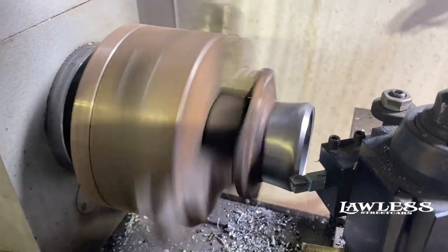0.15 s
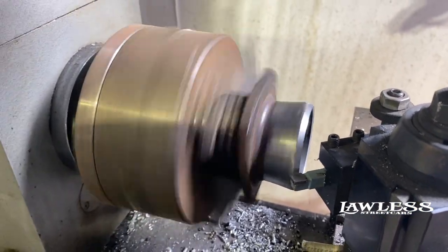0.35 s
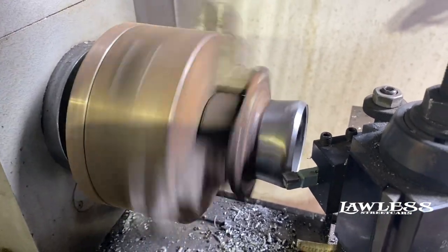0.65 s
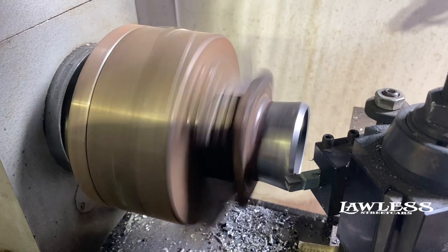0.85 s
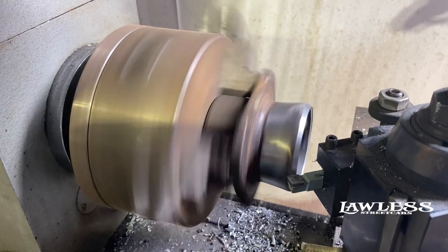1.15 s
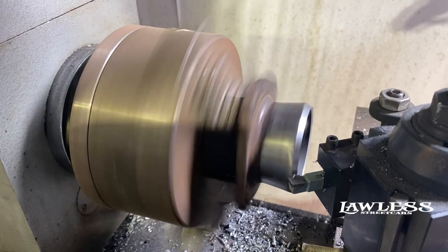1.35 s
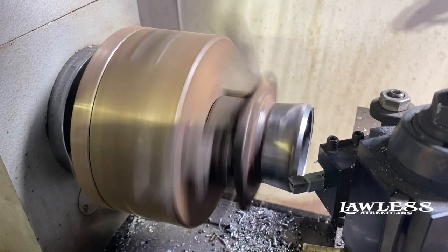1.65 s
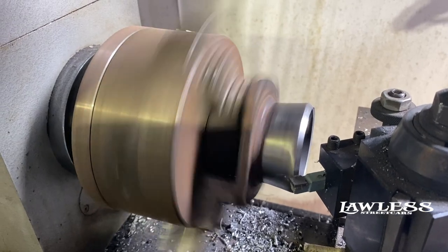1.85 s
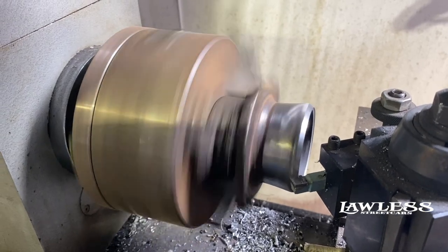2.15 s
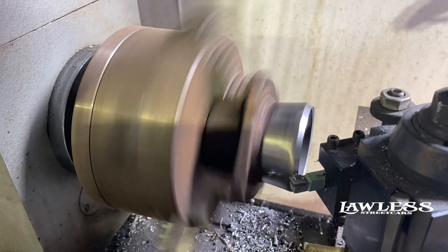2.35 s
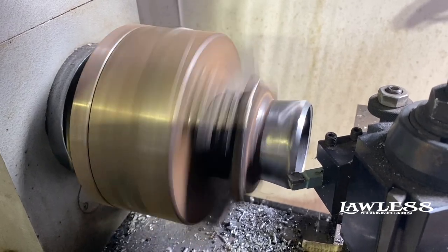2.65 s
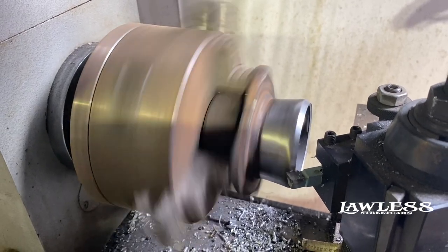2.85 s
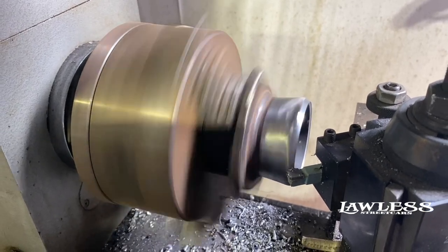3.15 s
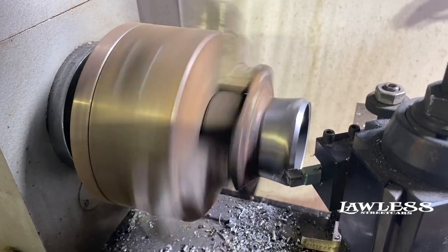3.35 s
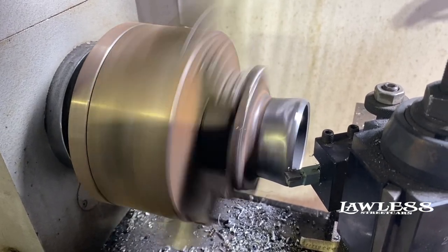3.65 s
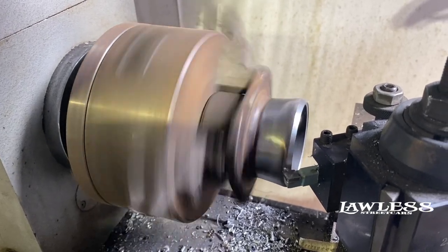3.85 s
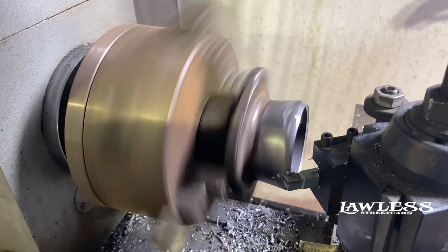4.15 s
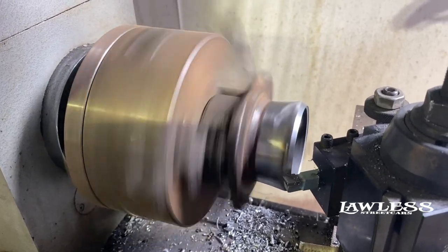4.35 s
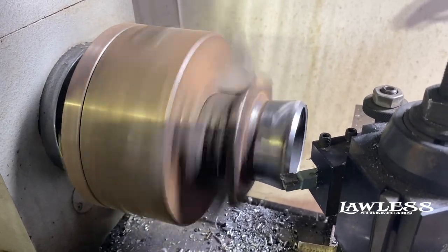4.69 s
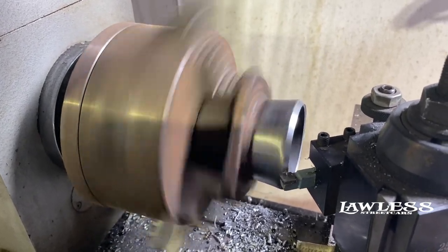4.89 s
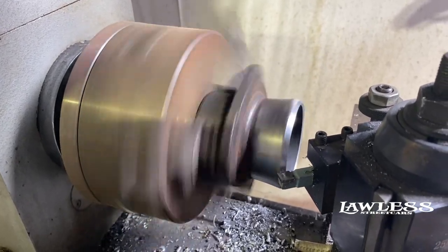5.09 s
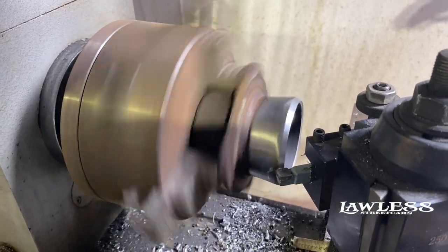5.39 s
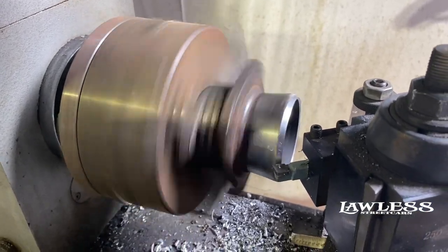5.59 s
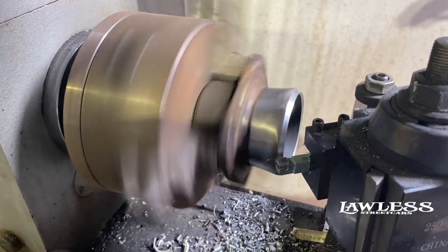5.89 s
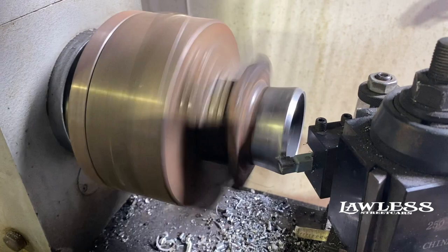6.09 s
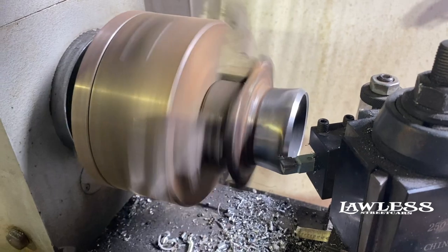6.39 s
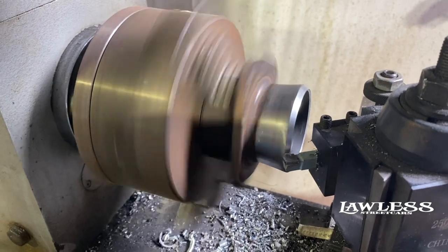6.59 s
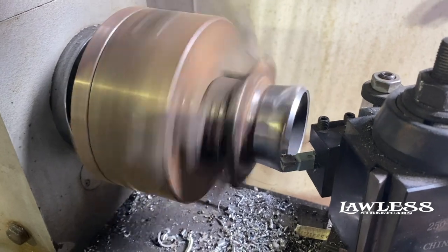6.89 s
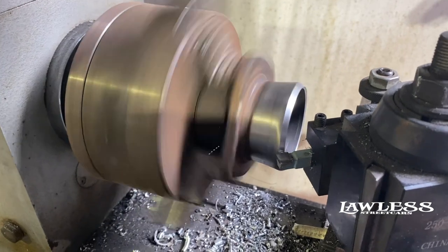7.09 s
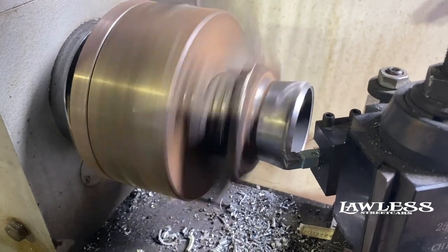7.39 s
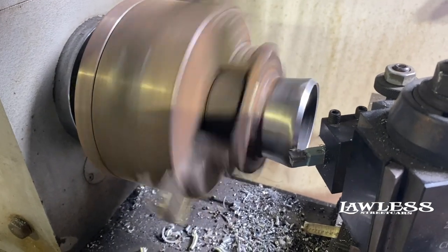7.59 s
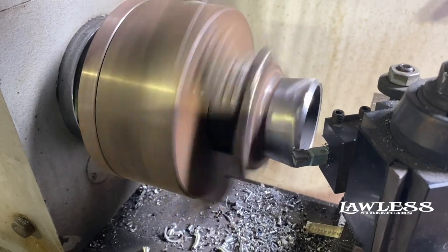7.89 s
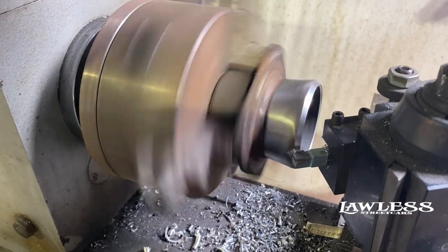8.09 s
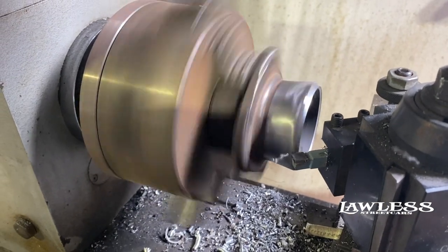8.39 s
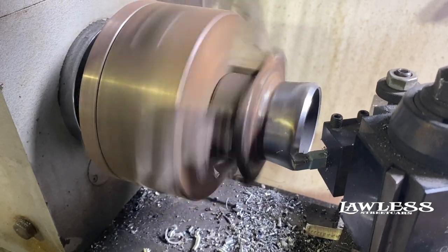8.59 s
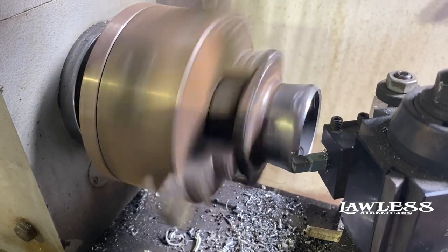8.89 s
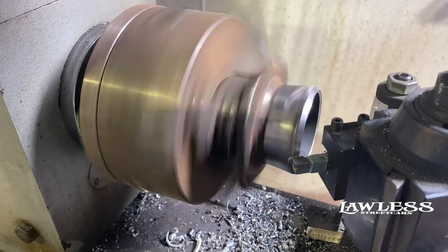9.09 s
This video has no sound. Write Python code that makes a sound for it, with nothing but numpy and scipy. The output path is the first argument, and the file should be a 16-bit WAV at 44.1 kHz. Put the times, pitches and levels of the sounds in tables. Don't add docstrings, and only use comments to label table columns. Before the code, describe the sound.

A rapid, regular pulse of metallic ticks and piercing squeals comes from a cutting tool meeting uneven spinning steel, heard close on a phone microphone. The squeals vary from turn to turn, with hissy scraping and sudden sharp chirps; the ticks grow firmer. Beneath lies a continuous motor hum with gear whine, slowly rising. Soft wind rumble comes and goes in the first half. Late on, the squeal thins to smaller stirrings between ticks.

```python
import sys
import numpy as np
from scipy import signal
from scipy.fft import rfft, irfft, next_fast_len
from scipy.io import wavfile
from scipy.ndimage import uniform_filter1d

SR = 44100
rng = np.random.default_rng(int(sys.argv[2]) if len(sys.argv) > 2 else 0)


def pcm_store(signal):
    levels = np.round(np.clip(np.atleast_2d(signal), -1, 1) * 32767)
    wavfile.write(sys.argv[1], SR, levels.astype(np.int16).T)


def invert_db(level):
    return 10 ** (np.asarray(level, dtype=float) / 20)


N = 407484
T = np.arange(N) / SR
FIRST_BITE_S, TURN_S, TURN_COUNT = -0.021, 0.169167, 55
BITE_S = FIRST_BITE_S + TURN_S * np.arange(TURN_COUNT)


def evened(x):
    return x / np.sqrt(np.mean(x ** 2) + 1e-20)


def curves(rows, at_s=T):
    s, *columns = np.transpose(rows)
    return [np.interp(at_s, s, column) for column in columns]


def coloured(points):
    f, db = np.transpose(points)
    size = next_fast_len(N)
    hz = np.fft.rfftfreq(size, 1 / SR)
    gain = invert_db(np.interp(np.log(hz + 1), np.log(f), db))
    return evened(irfft(rfft(rng.standard_normal(size)) * gain, size)[:N])


def wobble(hz):
    span = max(int(SR / hz / 2), 1)
    return evened(uniform_filter1d(uniform_filter1d(rng.standard_normal(N), span), span))


def resonate(x, hz, width):
    turn = np.exp(2j * np.pi * np.cumsum(hz * np.ones(N)) / SR)
    r = np.exp(-np.pi * width / SR)
    smooth = signal.lfilter([(1 - r) ** 2], [1, -2 * r, r * r], x / turn)
    return 2 * (turn * smooth).real


def body(x, modes):
    out = np.zeros(N)
    for hz, width, db in modes:
        r = np.exp(-np.pi * width / SR)
        stage = [1, 0, -1, 1, -2 * r * np.cos(2 * np.pi * hz / SR), r * r]
        even_power = ((1 - r * r) / 2) ** 1.5 * np.sqrt(2)
        out += invert_db(db) * even_power * signal.sosfilt([stage, stage], x)
    return out


def blows(db, late, rise, fall):
    train = np.zeros(N + SR)
    train[((BITE_S + late + 1) * SR).astype(int)] = invert_db(db)
    t = np.arange(SR // 4) / SR
    shape = np.exp(-t / fall) - np.exp(-t / (fall * rise))
    return signal.oaconvolve(train, shape / shape.max())[SR:SR + N]


# time in seconds, tick level in dB, bed thump level in dB,
# entry lump of chatter in ms after the bite, its half length in ms.
FEED = [(0, -48, -44.5, 12, 7.4), (.7, -44.5, -47, 10.6, 13), (1.5, -42, -43, 9, 18.5),
        (3.36, -41, -45.5, 11.2, 18), (5.049, -42, -43.5, 14.5, 13), (7.1, -41.5, -48.5, 16.2, 14.26),
        (7.5, -40.5, -48.5, 19, 15), (7.799, -38.5, -43.5, 10, 18), (9.24, -39.5, -47.5, 8.2, 14)]
# pitch in Hz, width in Hz, level in dB.
POST = [(615, 1280, -7), (1412, 104, -9), (1760, 320, -8), (2032, 160, -7.5), (2730, 220, -9.5),
        (4810, 510, -12.5), (5033, 420, -5.5), (5374, 600, -6), (7850, 1100, -11), (9200, 17000, -5.5),
        (12900, 2050, -17)]
# pitch in Hz, width in Hz, level in dB.
BED = [(136, 59, -10.5), (290.7, 31, -1), (317.6, 30, -9), (486, 245, -11)]


def bites():
    tick_db, thump_db, *_ = curves(FEED, BITE_S)
    thump_db = thump_db + rng.standard_normal(TURN_COUNT)
    crunch = rng.standard_normal(N) * invert_db(1.53 * wobble(hz=404))
    knock_db = tick_db - 4.0 + 2.23 * (tick_db + 43.0)
    knock = blows(knock_db, late=-0.0016, rise=0.45, fall=0.0028)
    grind = blows(tick_db - 5.0, late=-0.0082, rise=0.7, fall=0.01)
    shove = blows(thump_db + 12.5, late=0.00879, rise=0.085, fall=0.00016)
    rumble = rng.standard_normal(N) * blows(thump_db - 1.5, late=0.0041, rise=0.98, fall=0.018)
    return body(crunch * knock, POST[5:8]) + body(crunch * grind, POST) + body(shove + rumble, BED)


# time in seconds, rest pitch in Hz,
# octave from slapping in dB, extra arch of pitch in Hz, graze level in dB.
BAR = [(0, 6085, -11, 84, -51), (.5, 6083, -7.5, 145, -40), (.9, 6120, -15, 51, -28),
       (1.401, 6147, -13, 38, -32.5), (2.401, 6204, -15.5, 28, -30), (3.801, 6184, -14.5, 36, -32.5),
       (4.3, 6165, -15.5, 40, -26.5), (5.0, 6205, -18.5, 30, -28), (5.4, 6170, -13.5, 29.3, -26),
       (6.198, 6206, -13.5, 28, -29.5), (6.9, 6128, -11.5, 37, -35), (7.601, 6190, -11, 27, -34),
       (9.24, 6216, -13.5, 15, -38)]
# ms after the bite, half length in ms.
LUMPS = [
    (35, 30.7),
    (62, 41.5),
    (90, 23),
]
# entry, rise, crown and exit levels in
# dB.
ROUGHING = [(-12, -32.5, -27.5, -33.5), (-24.5, -33.5, -25.5, -54.0), (-26, -34.5, -23, -33),
            (-26, -50, -20.5, -38), (-44, -35.5, -23.0, -33), (-24, -71, -32, -39),
            (-25.0, -51, -30, -38.5), (-24.5, -66, -29, -37), (-36.5, -36, -26.5, -31.5),
            (-24.0, -50.5, -29.5, -68), (-27, -32, -35, -76), (-25, -33.5, -38.5, -42),
            (-26, -27, -44, -50), (-40.5, -60, -37.5, -65), (-45.0, -33.5, -42, -57),
            (-31.5, -24.5, -34.5, -34.5), (-31.5, -29.5, -44.0, -40.0), (-35, -29.5, -31.5, -52),
            (-47, -28.0, -37, -49), (-26, -38, -47, -60), (-28, -26.5, -72, -43), (-28, -24.5, -55, -67),
            (-32.5, -26.5, -34.5, -51)]
# entry, rise, crown and exit levels in dB.
MORE_ROUGHING = [(-29.5, -30.5, -44, -50), (-26.5, -27, -43.0, -27), (-33, -21, -41, -28),
                 (-28.5, -31, -30, -36.5), (-23, -29, -32.5, -41), (-30, -37.0, -29.0, -68),
                 (-22.5, -35.5, -56, -31.5), (-36, -68, -32.5, -40.5), (-78, -31, -30.0, -38),
                 (-34, -23, -36, -27.0), (-52, -45.5, -40.5, -25.5), (-28.5, -45, -27.5, -34),
                 (-34.5, -28.0, -31, -30), (-49, -50, -46, -36.5), (-58.0, -32, -50, -48),
                 (-26, -28.5, -33.5, -31), (-21.0, -43, -39.5, -27), (-22.5, -47, -30.5, -25),
                 (-22.5, -29, -59, -38.5), (-27.5, -32.5, -58.0, -55), (-26, -28.5, -43, -25.5),
                 (-39, -35.5, -89, -26.5), (-62, -31, -62, -36)]
# time in seconds, strength in dB, half length in ms.
SNATCHES = [(0.006, -35, 10), (0.666, -27, 5.2), (0.876, -31.5, 9.3), (1.353, -33, 11), (2.2, -26, 6.6),
            (2.707, -27.5, 6.0), (3.702, -49, 21), (4.226, -35, 4.9), (4.546, -33, 13.5),
            (4.574, -24.5, 4.2), (4.76, -22.5, 6.5), (4.805, -31, 4.0), (4.818, -29.0, 11),
            (4.931, -35.5, 9.4), (4.988, -39, 5.7), (5.082, -23, 7.1), (5.104, -28, 7.7),
            (5.246, -33, 10.6), (5.39, -41, 14), (5.648, -32.5, 5.4), (6.093, -21, 10.6),
            (6.411, -39.0, 13), (6.623, -28.5, 5.1), (6.752, -32, 7.1), (6.994, -38.5, 12),
            (7.161, -29.5, 9.8), (7.467, -26.5, 3.4), (7.642, -30.5, 5.1)]
# time in seconds, strength in dB, half length in ms.
STIRS = [(7.786, -42, 55), (7.929, -30, 7.3), (8.1, -43, 13), (8.153, -37.5, 16.5), (8.268, -36, 3.2),
         (8.287, -46, 52), (8.448, -33, 28), (8.54, -44.5, 12), (8.611, -43, 5.1), (8.616, -43, 56),
         (8.711, -38.5, 13.3), (8.775, -32.5, 27), (8.956, -35.5, 28), (9.122, -26, 11.6)]


def swells():
    rows = SNATCHES + STIRS
    *_, entry_ms, entry_half_ms = curves(FEED, BITE_S)
    graze_db = curves(BAR, BITE_S)[-1]
    turns = zip(BITE_S, entry_ms, entry_half_ms, graze_db, ROUGHING + MORE_ROUGHING)
    for s, late_ms, half_ms, first_db, turn_db in turns:
        graze = (-2.74, 6.24)
        lumps = [graze, (late_ms, half_ms)] + LUMPS
        rows = rows + [(s + ms / 1000, db, half) for (ms, half), db in zip(lumps, [first_db, *turn_db])]
    return rows


# ms after the bite, Hz above rest.
ARC = [(-13.5, 201), (4, 114.5), (15, 29.5), (28.5, -17.5), (50, 8.5), (82, 41), (95.5, -2.5), (99, -44.5),
       (147, 1)]
# time in seconds, level in dB.
SCRAPE_LEVEL = [(0, -35.5), (.8, -37.5), (1.2, -36.5), (3, -47), (5.5, -41), (9.24, -37)]
# frequency in Hz, level in dB.
SCRAPE_COLOUR = [(3500, -11.5), (5000, 7), (7000, 4.5), (8500, -6.5), (10500, -1.5), (12300, 2), (14000, 0),
                 (16000, -2.5)]


def chatter():
    bar_hz, slap_db, arch_hz, _ = curves(BAR, BITE_S)
    turn_now = np.maximum(np.searchsorted(BITE_S, T + .012) - 1, 0)
    since_ms = 1000 * (T - BITE_S[turn_now])
    rest_hz = np.interp(T - .04, BITE_S, bar_hz)

    push = np.zeros(N)
    for s, db, half_ms in swells():
        start, end = (max(int((s + side * half_ms / 1000) * SR), 0) for side in (-1, 1))
        near = slice(start, end)
        push[near] += invert_db(.6 * db) * (1 - ((T[near] - s) * 1000 / half_ms) ** 2) ** 2
    touch = np.clip((since_ms + 3.85) / 4.6, .12, 1)
    flutter = invert_db(3.24 * np.tanh(1.16 * wobble(hz=153)) + 1.73)
    swing = push ** (5 / 3) * uniform_filter1d(touch, size=90) * flutter
    widest = 0.222
    swing = widest * np.tanh(swing / widest)

    arch_top_ms, arch_half_ms = 52, 33
    from_top = (np.maximum(since_ms, 25) - arch_top_ms) / arch_half_ms
    arch = arch_hz[turn_now] * (.5 - np.minimum(from_top ** 2, 1.5))
    growth = np.gradient(uniform_filter1d(np.log(push + 0.0095), size=500)) * SR / 1000
    sag_hz = 350 * swing - 260 * growth
    arc_hz = np.interp(since_ms, *np.transpose(ARC))
    hz = rest_hz + arch + arc_hz - sag_hz + 18
    hz = hz + 24 * wobble(hz=47.4) + 20 * wobble(hz=215)
    turn = 2 * np.pi * np.cumsum(hz) / SR

    tone = np.sqrt(2) * swing * np.cos(turn)
    wide = (swing / 0.071) ** 0.82
    octave = np.sqrt(2) * swing * wide * invert_db(slap_db[turn_now] + 2.8 * wobble(hz=202))
    octave *= np.cos(2 * turn + 1.0) + 0.096 * coloured([(9000, -28), (12200, 2), (16000, -33)])
    scrape_db = curves(SCRAPE_LEVEL)[0] + 7.5 + 4.3 * wobble(hz=300)
    scrape = swing ** 0.72 * invert_db(scrape_db) * coloured(SCRAPE_COLOUR)
    rubbing = evened(resonate(rng.standard_normal(N), rest_hz, 200))
    rubbing = rubbing * invert_db(-60 + 11.8 * np.tanh(wobble(hz=29.7)))
    return tone + octave + scrape + rubbing


def shop(x):
    at = np.arange(200, SR // 2, 22)
    taps = np.zeros(SR // 2 + 22)
    sign = rng.choice([-1., 1.], len(at))
    taps[at + rng.integers(0, 22, len(at))] = sign * invert_db(-60 * at / SR / 0.11)
    return signal.oaconvolve(x, taps / np.linalg.norm(taps))[:N]


# time in seconds, level in dB.
HUM = [(0.0, -53.5), (0.64, -54), (2.96, -51.5), (5.46, -50.5), (9.24, -47)]
# frequency in Hz, level in dB per Hz.
HUM_COLOUR = [(35, -21.5), (120, 0), (300, -5.5), (460, -11.5), (900, -8.5), (2250, -11), (3060, -16.5),
              (4200, -7.5), (5800, -16.5), (7100, -15), (9300, -20.5), (15700, -20.5)]
# pitch in Hz, width in Hz, level in dB over the hum.
HOUSING = [(131, 140, -12), (206.9, 7.4, -12.5), (279, 28.5, -7.5), (310, 4.5, -6.5), (327, 78, -9.5),
           (1131, 16, -20), (1413, 9.2, -16), (1504.7, 71, -7), (2262, 64, -8), (2342.6, 92, -6),
           (2444, 410, -8), (3620, 41, -16), (4137, 61, -14), (5180, 770, -14), (10200, 99, -19.5)]
# pitch in Hz, level in dB over the hum.
WHINES = [(1499, -8.5), (2258, -7)]


def machine():
    wide = coloured(HUM_COLOUR) * invert_db(1.0 + 0.85 * wobble(hz=25.2))
    rings = body(rng.standard_normal(N), HOUSING) * invert_db(0.17 * wobble(hz=24))
    tones = np.zeros(N)
    for hz, db in WHINES:
        level = invert_db(db + 1.9 * wobble(hz=7.3))
        tones += level * np.sin(2 * np.pi * np.cumsum(hz + 12 * wobble(hz=30.15)) / SR)
    return invert_db(curves(HUM)[0]) * (wide + rings + tones)


# start in seconds, deep buffet in dB, upper rumble in dB, dying time in seconds.
GUSTS = [(1.17, -60, -52, 0.14), (1.419, -42, -43, 0.46), (2.0, -58, -47.5, 0.26),
         (2.299, -54, -48.5, 0.49), (2.55, -46, -45, 0.79), (2.849, -63, -49, 0.6),
         (3.599, -65, -42.5, 0.13), (3.97, -52, -43.5, 0.14), (4.4, -61, -49, 0.29), (4.68, -70, -60, 0.14),
         (8.7, -71, -51.5, 0.71)]
# frequency in Hz, level in dB per Hz.
WIND_COLOUR = [
    [(30, -32), (55, -2), (75, 8), (110, -37), (200, -61)],
    [(70, -23), (120, 8), (200, 8.5), (260, -11), (450, -77)],
]


def wind():
    level = np.zeros((2, N))
    for s, deep_db, upper_db, dying in GUSTS:
        since = np.maximum(T - s, 0)
        gust = np.minimum(since / 0.048, 1) * np.exp(-(since / dying) ** 1.25)
        level += invert_db([[deep_db], [upper_db]]) * gust
    out = np.zeros(N)
    for gain, colour in zip(level, WIND_COLOUR):
        out += gain * invert_db(2.16 * wobble(hz=7.6) - 0.5) * coloured(colour)
    return out


# start in seconds, level in dB.
PEEPS = [
    (2.1784, -41),
    (2.3444, -47),
    (2.517, -40),
]


def peeps():
    shape = sum(invert_db(db) * np.exp(-((T - s - .016) / 0.013) ** 4) for s, db in PEEPS)
    return shape * np.sin(2 * np.pi * 7632 * T)


def scene():
    tool = chatter() + bites() + peeps()
    return (tool + invert_db(-15.0) * shop(tool) + machine() + wind())[None]


def band_limit(x):
    return signal.sosfilt(signal.butter(12, 15840, fs=SR, output="sos"), x)


def record(dry):
    x = signal.sosfilt(signal.butter(4, 48, "high", fs=SR, output="sos"), dry)
    hz, _, z = signal.stft(x, SR, nperseg=1024)
    power = abs(z[0]) ** 2
    squeal_db = 10 * np.log10(power[(hz > 5800) & (hz < 6600)].sum(0) + 1e-12)
    band_db = 10 * np.log10(uniform_filter1d(power, size=13, axis=0) + 1e-16)
    hz = hz[:, None]
    mask_db = squeal_db - 42.5 - 5.9 * (hz - 6700) / 1000
    hidden = (band_db < mask_db) & (hz > 6650)
    z[0] *= ~hidden & (hz < 15800)
    return band_limit(signal.istft(z, SR, nperseg=1024)[1][:, :N])


dry = scene()
out = record(dry)
pcm_store(out)
```